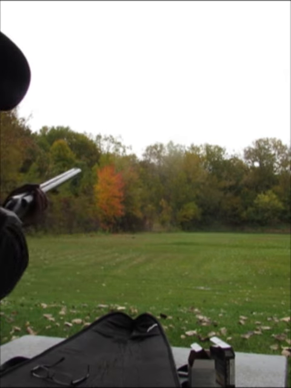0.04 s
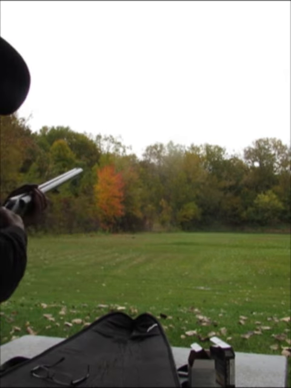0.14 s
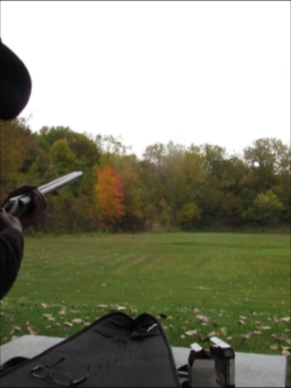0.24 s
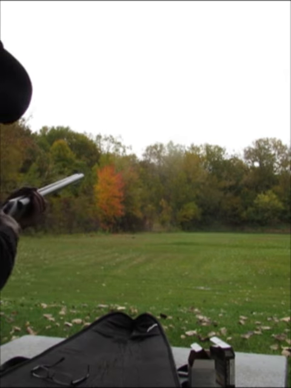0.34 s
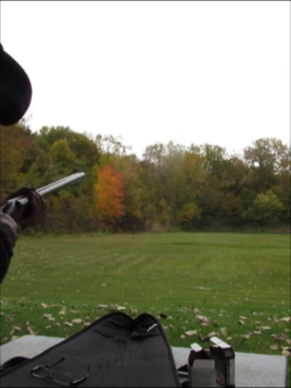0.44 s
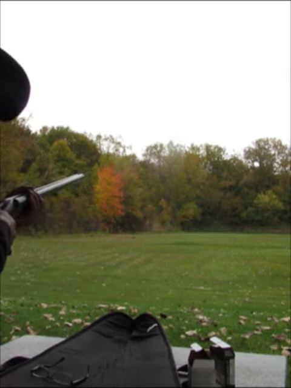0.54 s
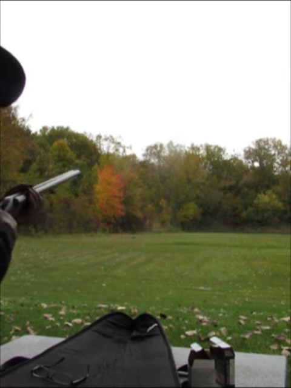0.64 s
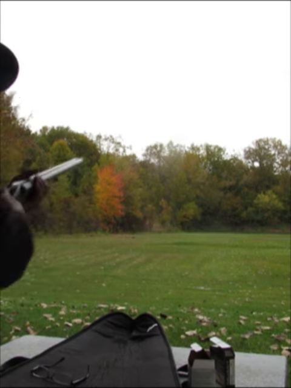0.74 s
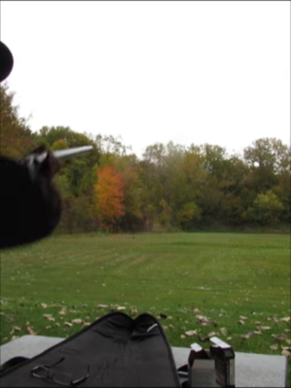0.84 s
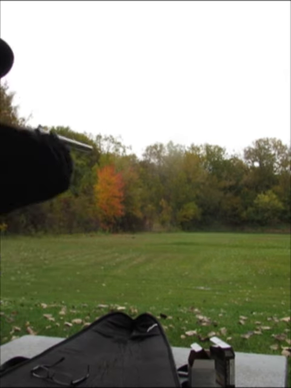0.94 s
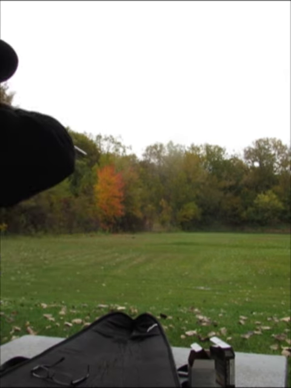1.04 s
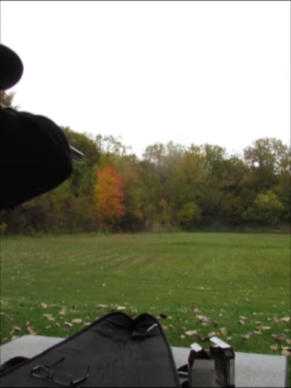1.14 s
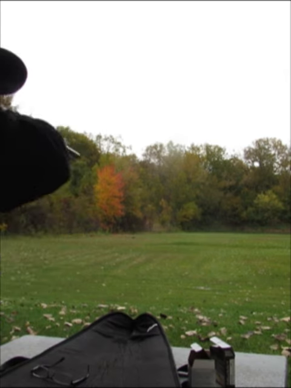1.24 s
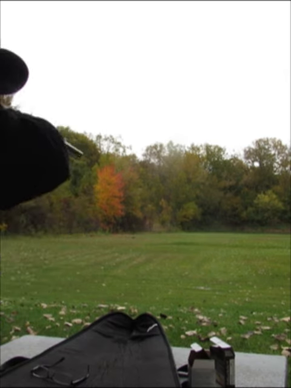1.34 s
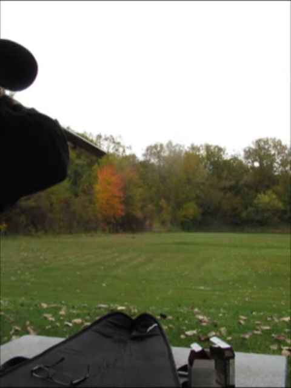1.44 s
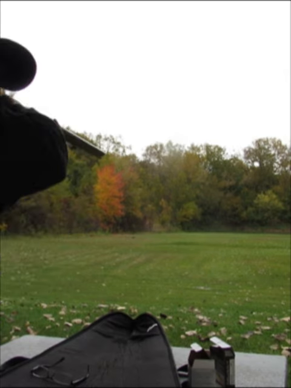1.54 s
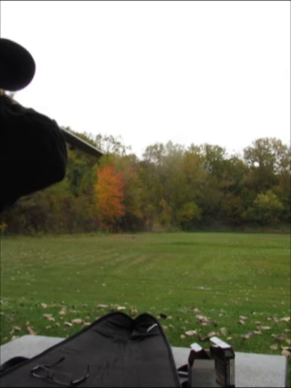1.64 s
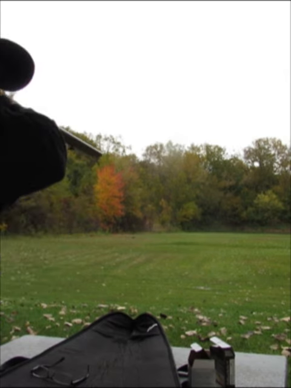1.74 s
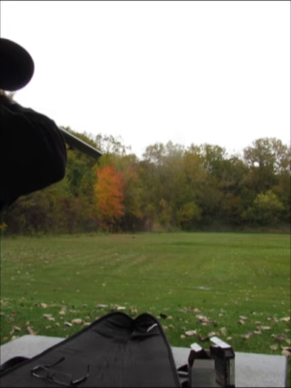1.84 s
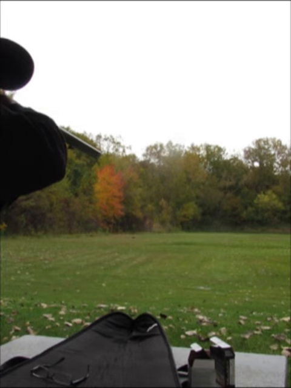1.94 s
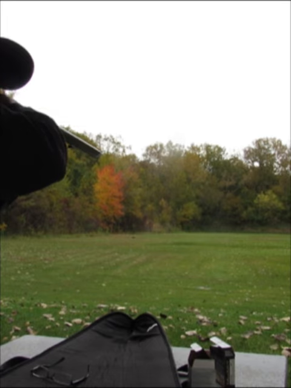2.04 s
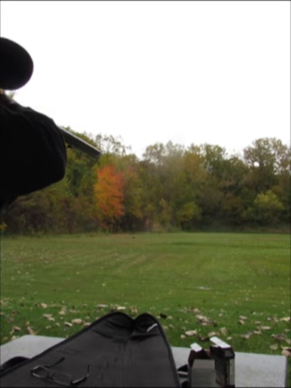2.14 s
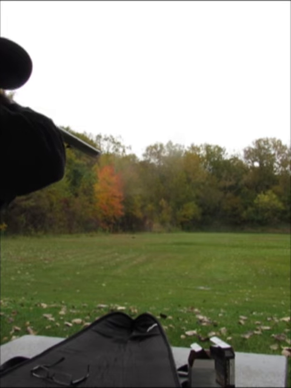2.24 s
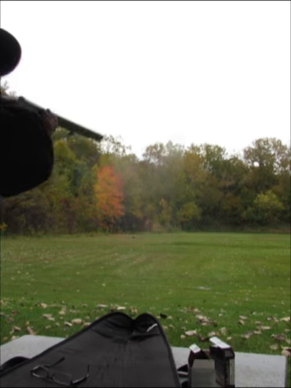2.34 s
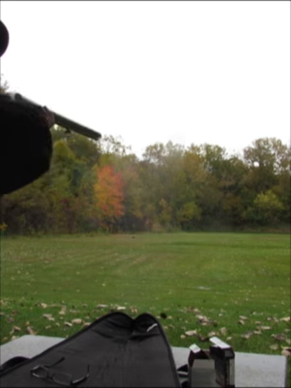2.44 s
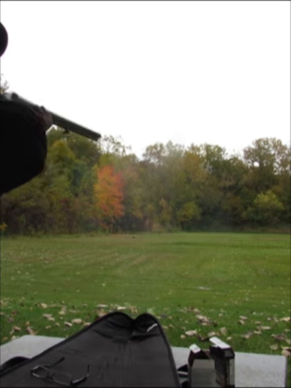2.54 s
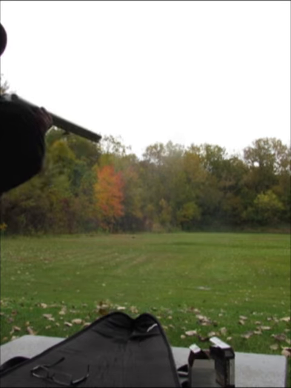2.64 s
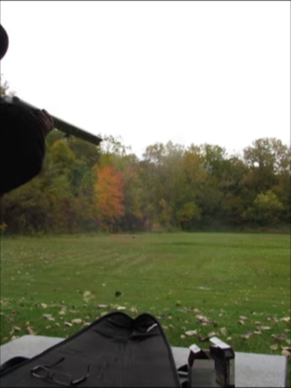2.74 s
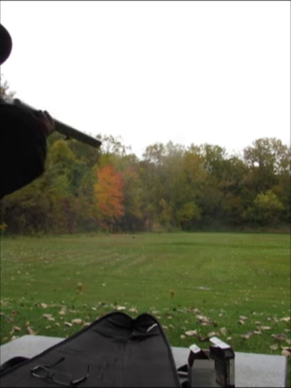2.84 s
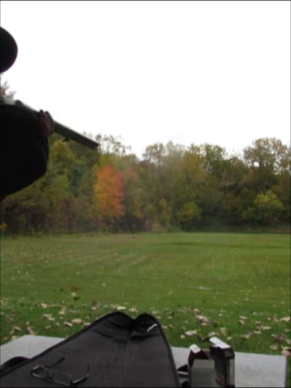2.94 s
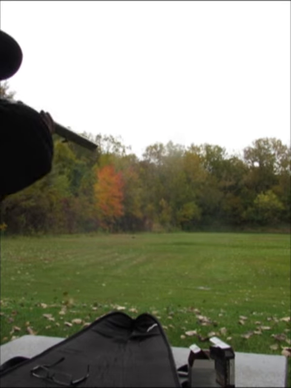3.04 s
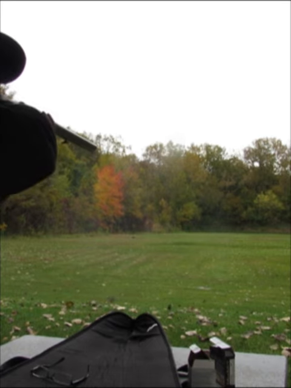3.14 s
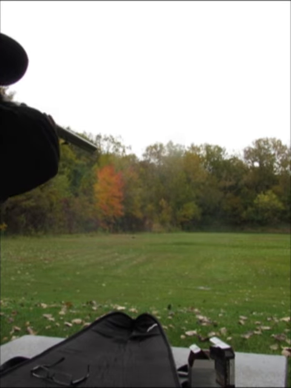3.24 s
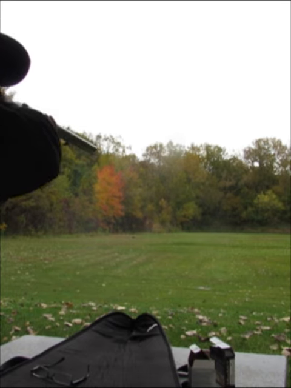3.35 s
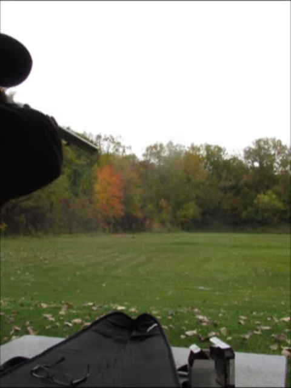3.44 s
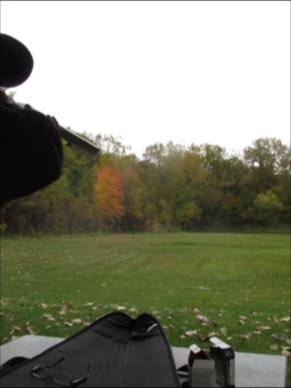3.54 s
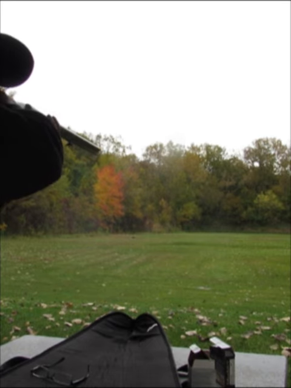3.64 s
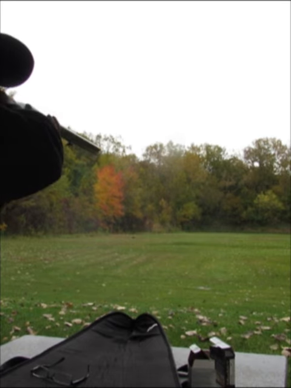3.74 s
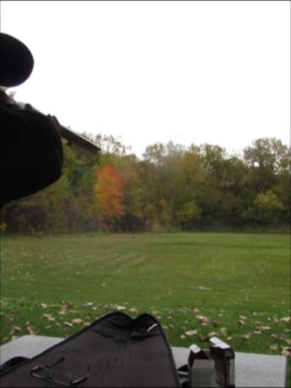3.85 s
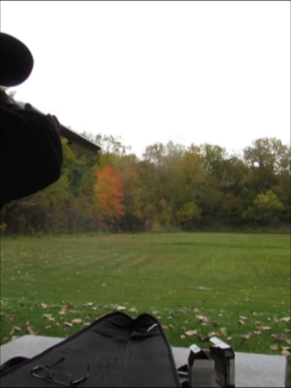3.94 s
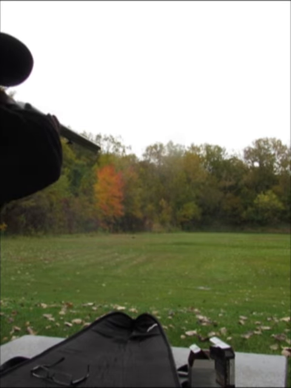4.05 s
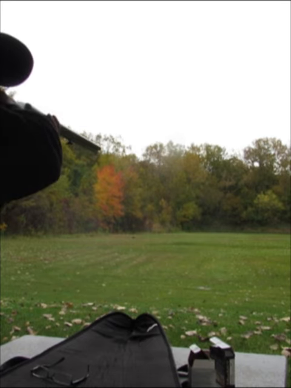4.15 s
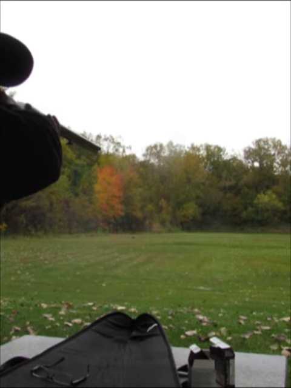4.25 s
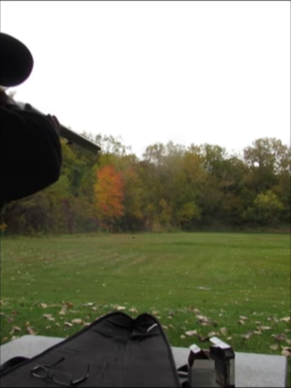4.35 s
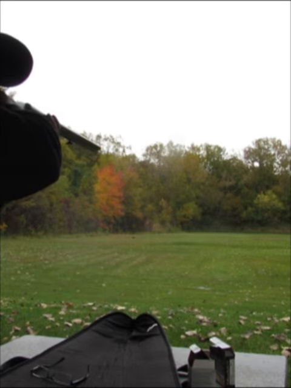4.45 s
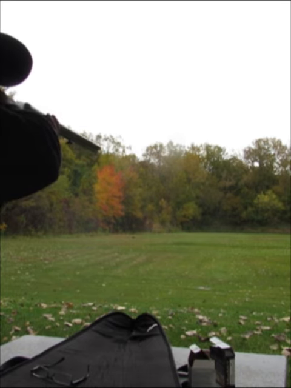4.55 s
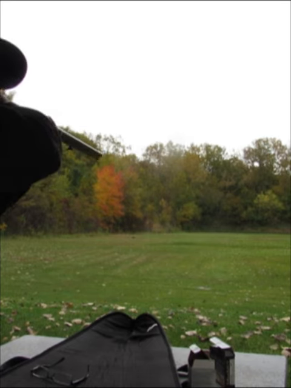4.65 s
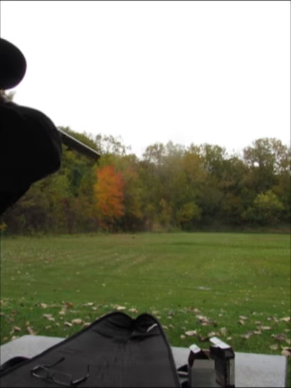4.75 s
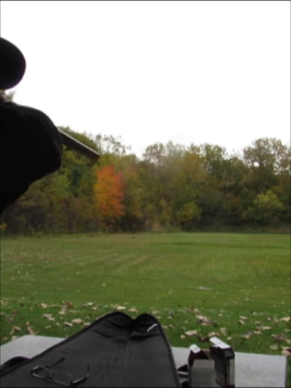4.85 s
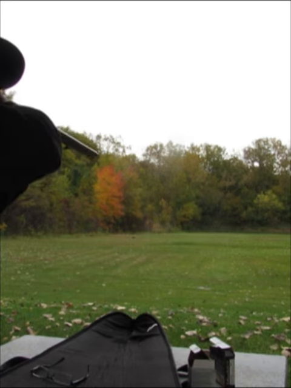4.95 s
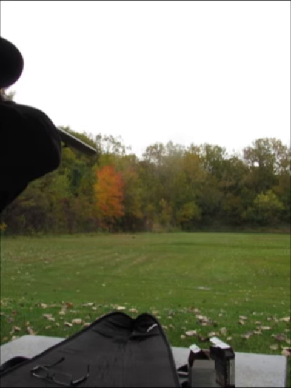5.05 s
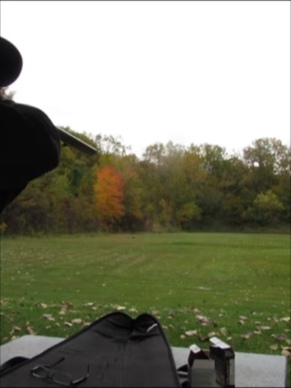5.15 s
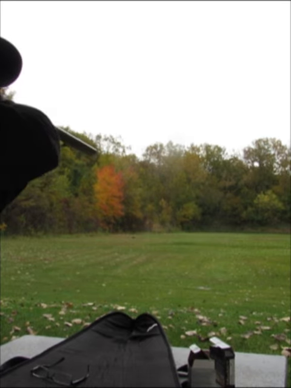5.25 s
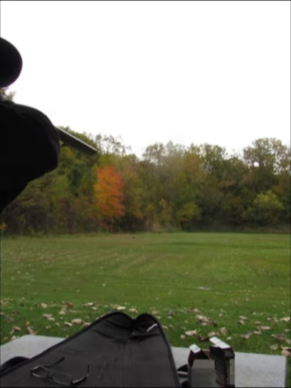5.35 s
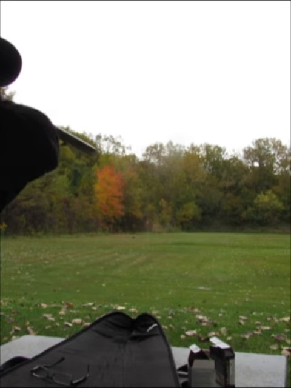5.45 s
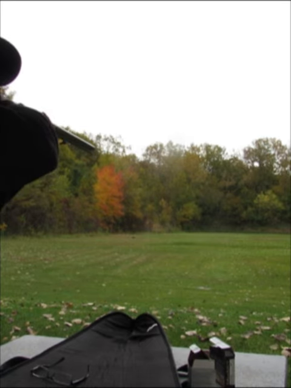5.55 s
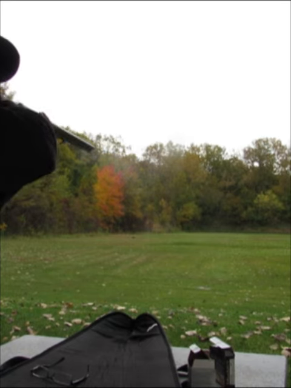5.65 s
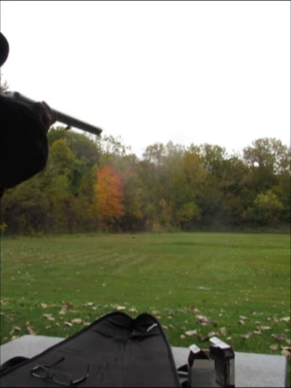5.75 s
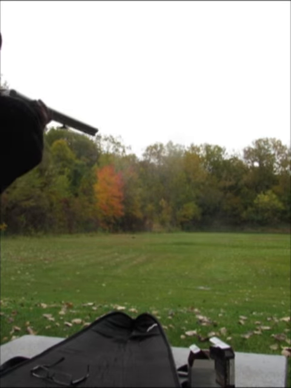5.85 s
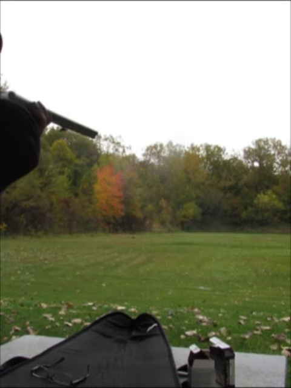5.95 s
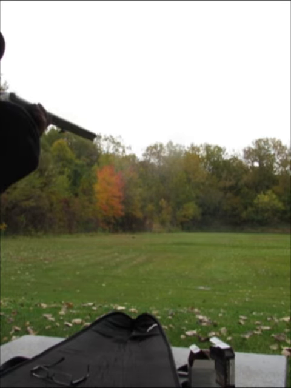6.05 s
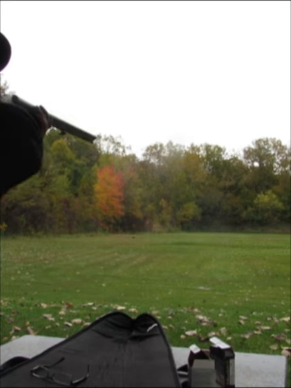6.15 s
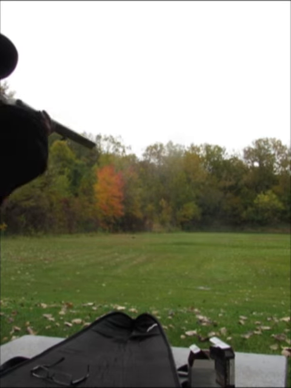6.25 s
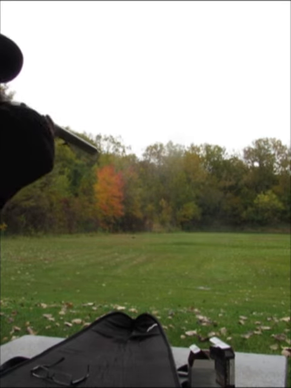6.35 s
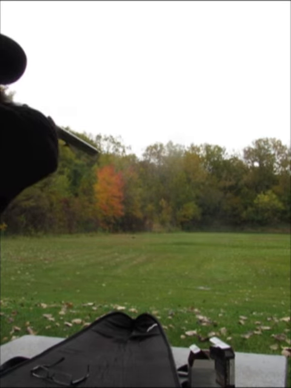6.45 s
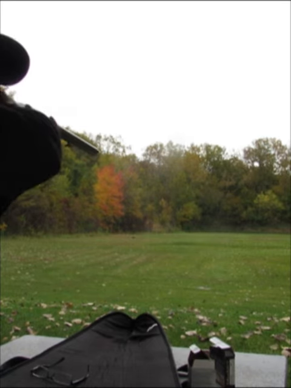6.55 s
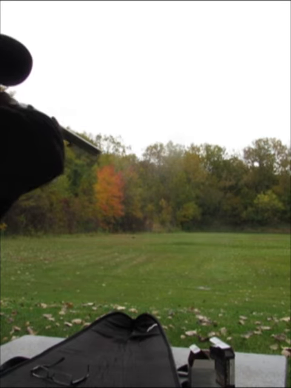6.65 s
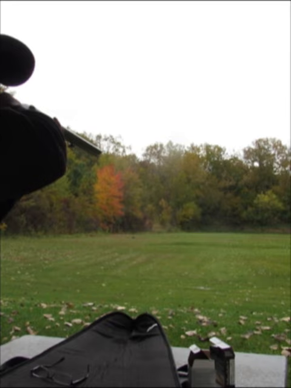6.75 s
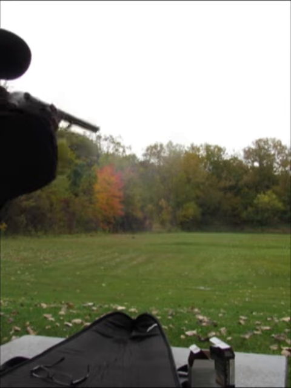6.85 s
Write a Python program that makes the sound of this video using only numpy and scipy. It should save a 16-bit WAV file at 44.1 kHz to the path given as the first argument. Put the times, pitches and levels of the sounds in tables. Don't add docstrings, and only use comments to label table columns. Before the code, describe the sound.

An open field edged by woods, heard from a small stereo microphone on a shooting bench, with low wind buffeting and soft leafy, clothy hiss. Light metal ticks begin at once; at 0.46 s a break-action gun snaps shut with a bright steel clack, followed by taps and handling from 0.7 to 1.1 s. A tiny silent gap at 1.46 s changes the scene; a wind thump and a faint falling bird whistle follow by 1.6 s. At 2.36 s the loudest shot overloads the microphone, booms in the bench and rolls back from the trees, duller and fading until about 4.6 s, with the background ducked and faint ticks. After another cut at 4.67 s, wind returns; a short trigger creak at 5.6 s leads into a sharper shot at 5.72 s. Knocks and thuds run 5.97 to 6.5 s over its echo. A third shot hits at 6.83 s, cut off by the ending.

```python
import sys
import numpy as np
from scipy import signal
from scipy.io import wavfile
from scipy.ndimage import uniform_filter1d

SR = 44100
rng = np.random.default_rng(int(sys.argv[2]) if len(sys.argv) > 2 else 0)


def bounce(signal):
    frames = np.transpose(np.atleast_2d(signal))
    limited = np.clip(frames, -1, 1)
    pcm = np.round(limited * 32767).astype(np.int16)
    wavfile.write(sys.argv[1], SR, pcm)


def gain_from_db(level_db):
    decades = np.asarray(level_db, float) / 20
    return 10 ** decades


N = 303849

CONTROL_STEP = 64
BAND_EDGES_HZ = 80 * 2 ** np.arange(0, 7.7, 1 / 3)
LEVEL_BAND_HZ = 800, 2500

# pitch_hz, level_db per Hz
FIELD_COLOUR = [(90, -1.5), (251, -10.5), (500, -13.5), (1620, -24.5), (3200, -32), (4600, -40),
                (12000, -47.5), (15000, -58)]
# pitch_hz, likeness (-1 to 1)
FIELD_LIKENESS = [(60, -0.62), (180, -0.067), (550, 0.036), (1650, 0.47), (4970, 0.66), (15000, 0.06)]
# time_s, level_db, tilt_db per octave
FIELD_LEVEL = [(0, -56.5, 3.5), (.42, -54, 1.93), (.9, -50, 2.12), (1.46, -51, 2.36), (1.47, -57, 2.53),
               (2.35, -57, 2.5), (2.37, -60.5, -5), (3.9, -72.5, 3.5), (4.66, -72, 4), (4.68, -56.5, 2.1),
               (5.71, -57.5, 2.1), (5.73, -66.5, -9.5), (6.9, -66, -10.5)]

# time_s, level_db
WIND_LEVEL = [(0, -48), (.55, -46), (.95, -47), (1.45, -35), (1.56, -38.5), (1.85, -46), (2.13, -41),
              (2.3, -54), (2.65, -58), (3.1, -54), (4.0, -66), (4.5, -51), (4.7, -56.5), (4.95, -41.5),
              (5.25, -49), (5.66, -45), (6.0, -68), (6.8, -67.5)]
# time_s, likeness (-1 to 1)
WIND_LIKENESS = [(0, 0), (1.46, 0), (1.47, -.7), (7, -.7)]
# time_s, level_db
WIND_PUFFS = [(0.0, -34.5), (.114, -41), (.6, -47), (.784, -40), (1.358, -58), (1.948, -54), (2.092, -40),
              (3.264, -57), (3.426, -53), (3.586, -50), (3.774, -37.5), (4.118, -55), (4.616, -43),
              (4.847, -35), (5.106, -43), (5.384, -48), (5.486, -52), (5.594, -55), (6.328, -59),
              (6.54, -59)]
# start_s, peak_db, pitch_hz
GUSTS = [(1.472, -20.5, 93), (1.588, -38, 77), (1.649, -40, 96.9), (1.914, -30.5, 114), (2.037, -34, 94),
         (2.096, -35, 69), (3.763, -41, 89), (4.088, -55, 107), (4.496, -51, 92), (4.568, -38, 74),
         (4.599, -49, 87.5), (4.824, -56, 72.7), (5.088, -47, 142), (5.469, -50, 61.9),
         (6.678, -42.5, 96.9)]
PUFF_S, GUST_S = 0.019, 0.045
GUST_OPPOSITE = 6

# time_s, pitch_hz, level_db
BIRD_WHISTLE = [(1.491, 3440, -70), (1.55, 3360, -67), (1.595, 3300, -76), (1.625, 3240, -56),
                (1.66, 3150, -66), (1.73, 3100, -74)]

# pitch_hz, level_db per Hz
WOODS_COLOUR = [(90, -13), (127, -3.5), (347, -2), (688, 1), (1450, -2), (2800, -12), (7890, -29.5),
                (14000, -58.5)]
# pitch_hz, likeness (-1 to 1)
WOODS_LIKENESS = [(60, 0.23), (180, 1), (550, 0.73), (1650, 0.93), (4970, 0.91), (15000, 0.21)]
# pitch_hz, left_over_right_db
WOODS_PAN = [(60, -4), (240, -8), (950, -1), (3770, -0.5), (15000, 2.5)]
# time_after_shot_s, level_db
ROLLS = [
    [(.16, -24.5), (.25, -27.5), (.57, -31), (.85, -34), (1.1, -37.5), (1.3, -40), (1.6, -44.5),
     (1.9, -50.5), (2.3, -55)],
    [(.15, -34), (.23, -34.5), (.47, -38.5), (.75, -40), (1.1, -43)],
]
ROLL_BASS_DB = [-0.93, 1.5]
# pitch_hz, loss_db per second of travel
AIR_LOSS = [(100, -12.5), (270, -5), (1400, -1.4), (2800, 6), (4600, 15.5), (10000, 50), (15000, 101)]
WOODS_COLOUR_AT_S = 0.48
TREELINE_S, TREELINE_WIDTH_S = 1.1, 0.17
TREELINE_DB_PER_OCTAVE, TREELINE_FROM_HZ = 6.5, 1100
TREELINE_SHARE = [0.67, .3]

# start_s, peak_db, pitch_hz, t60_s
TICKS = [(0.0044, -43.5, 4900, 0.32), (0.003, -42.5, 1570, 0.32), (0.2794, -53, 6040, 0.05),
         (0.304, -45.5, 2500, 0.05), (0.3994, -52, 3500, 0.041), (0.7557, -41, 4860, 0.05),
         (0.9388, -42.5, 5530, 0.083), (1.0594, -48, 8360, 0.093), (1.1194, -44, 5920, 0.025),
         (3.9494, -64, 6500, 0.046), (4.0494, -61, 8500, 0.037), (4.1994, -67, 7000, 0.052),
         (4.3294, -67, 6500, 0.05), (4.3694, -61, 7000, 0.043), (4.5294, -60, 8200, 0.038),
         (4.6952, -46.5, 4230, 0.032), (5.1094, -62, 3530, 0.056), (5.3408, -49, 4290, 0.027),
         (6.6967, -48, 4060, 0.053), (6.7494, -52, 3650, 0.06)]
# start_s, peak_db, pitch_hz, t60_s
KNOCKS = [
    (0.768, -27, 380, 0.065),
    (5.969, -26, 2730, 0.053),
    (5.989, -22, 263, 0.048),
    (6.2, -17.5, 471, 0.041),
    (6.259, -23, 524, 0.032),
    (6.398, -26, 506, 0.15),
    (6.511, -25, 476, 0.076),
          (0.731, -41, 1300, 0.23), (0.761, -37, 1500, .08), (.96, -47, 5200, .08),
               (.742, -39, 1880, 0.065), (0.758, -45, 4750, 0.14), (0.777, -38.5, 1870, 0.06),
               (0.791, -40.5, 7200, .02), (.938, -46, 5600, .04), (0.944, -37, 1700, 0.043),
               (.947, -44, 2900, .05), (1.12, -37, 1580, 0.044)]

# time_s, slip_rate_hz, level_db
CREAK_START = [(5.59, 940, -70), (5.61, 950, -64), (5.635, 955, -72)]
# multiple, level_db
CREAK_START_PARTIALS = [(3, 0), (5, 0), (6, -3), (10, -5)]
# time_s, slip_rate_hz, level_db
CREAK = [(5.61, 950, -70), (5.63, 955, -58), (5.64, 966, -49), (5.68, 968, -47), (5.713, 968, -51)]
# multiple, level_db
CREAK_PARTIALS = [(4, -2), (5, -26), (6, -19), (7, -20), (8, -13), (10, -24), (12, -28)]

# start_s, peak_db
LATCH = [
    (0.4572, -9.5),
]
# pitch_hz, half_width_hz, level_db
STEEL = [(700, 450, -23), (1830, 240, 4), (3500, 1600, -3.5), (6120, 1050, 9), (9100, 840, -15),
         (13000, 1370, 11)]

# pitch_hz, level_db, t60_s
BENCH_MODES = [(131.8, -2, 0.55), (143.9, -4.5, 0.35), (198.2, -7, 0.17), (241.4, -9.5, 0.052),
               (265, -4, .22), (293.6, 0, 0.23), (339, -1, 0.29), (396, -11, .15), (450, -5.5, 0.16),
               (571, -11, 0.19)]
# level_db, swell_s, share of ring time, deepest_mode_db
BENCH_BOOMS = [
    (3.5, 0.041, 1.3, -2),
    (-2, 0.025, 1.5, -5.5),
    (-3.5, 0.019, 0.49, -8),
]
BENCH_ECHO_S, BENCH_ECHO_DB = 0.0046, 4
LULL_S, LULL_WIDTH_S, LULL_DEPTH = 0.141, 0.0056, 0.8

# start_s, drive_db, blast_t60_s, crack_db, stereo_spread (0 to 1)
SHOTS = [
    (2.3568, -1.5, 0.46, 3, 0.9),
    (5.715, -3.5, 0.4, 9.5, 0.6),
    (6.833, -5.5, 0.56, 8.5, 0.7),
]
# dull_db, bright_edge_db
MUZZLE_DB = [
    (6., -10.),
    (4., 0.),
    (-6., -18.),
]
# pitch_hz, level_db per band
BLAST_COLOUR = [(100, -9.5), (250, -4.5), (500, -9), (1300, -1.5), (3000, -12), (7000, -6.5), (14000, -6.5)]
# pitch_hz, share of blast t60
BLAST_DECAY = [(100, 0.79), (1000, 0.78), (4000, 0.86), (14000, 0.42)]
# pitch_hz, likeness (-1 to 1)
BLAST_LIKENESS = [(100, .4), (500, .4), (1300, 0.5), (2400, 1), (4400, 0.65), (8000, 0.33), (14000, .25)]
GAS_SWELL_S = 0.013
CRACK_SIDE_SHARE = 0.25
SLAM_DB, SLAM_S = -0.5, 0.096

# start_s, end_s
SCENE_CHANGES = [
    (1.4612, 1.4712),
    (4.666, 4.6765),
]


def rms_one(x):
    return x / np.sqrt(np.mean(x ** 2) + 1e-20)


def at_hz(points, hz):
    pitch_hz, value = np.array(points).T[:2]
    return np.interp(np.log(hz), np.log(pitch_hz), value)


def in_time(rows, t):
    time_s, *columns = np.transpose(rows)
    return np.array([np.interp(t, time_s, column) for column in columns])


def band(x, low_hz, high_hz, order=2):
    sos = signal.butter(order, [low_hz, min(high_hz, 0.45 * SR)], "band", fs=SR, output="sos")
    return signal.sosfilt(sos, x)


def drift(rate_hz):
    r = np.exp(-2 * np.pi * rate_hz * CONTROL_STEP / SR)
    noise = rng.standard_normal(N // CONTROL_STEP + 1001)
    return rms_one(signal.lfilter([1], [1, -2 * r, r * r], noise)[1000:])


def ring(x, hz, t60):
    r, w = gain_from_db(-60 / (t60 * SR)), 2 * np.pi * hz / SR
    return signal.lfilter([0, np.sin(w)], [1, -2 * r * np.cos(w), r * r], x + 1e-18)


def stereo(mid, side, likeness):
    likeness = np.clip(likeness, -0.97, 0.97)
    return mid + np.sqrt((1 - likeness) / (1 + likeness)) * side * [[1], [-1]]


def add(out, start_s, sound):
    i = round(start_s * SR)
    out[:, i:i + sound.shape[-1]] += sound[..., :N - i]


def diffuse(level_db, colour, likeness, patchy_db, pan=((1, 0), (2, 0))):
    t = np.arange(N // CONTROL_STEP + 1) * CONTROL_STEP / SR
    steps = np.arange(N) / CONTROL_STEP
    centres = np.sqrt(BAND_EDGES_HZ[1:] * BAND_EDGES_HZ[:-1])
    widths = np.diff(BAND_EDGES_HZ)
    share_db = at_hz(colour, centres) + 10 * np.log10(widths)
    counted = (centres > LEVEL_BAND_HZ[0]) & (centres < LEVEL_BAND_HZ[1])
    share_db -= 10 * np.log10(np.sum(gain_from_db(2 * share_db[counted])))
    out = np.zeros((2, N))
    white = rng.standard_normal((2, 2, N))
    together = drift(3.5)
    for k, hz in enumerate(centres):
        db = share_db[k] + level_db(t, hz) + patchy_db * (0.53 * together + drift(13.0))
        noise = band(white[k % 2], BAND_EDGES_HZ[k], BAND_EDGES_HZ[k + 1], order=3)
        mid, side = noise * np.sqrt(SR / 2 / widths[k])
        lean = gain_from_db(at_hz(pan, hz) / 2 * np.array([[1], [-1]]))
        gain = np.interp(steps, np.arange(len(t)), gain_from_db(db))
        out += lean * stereo(mid, side, at_hz(likeness, hz)) * gain
    return out


def glide_tone(rows, partials, wobble):
    t = np.arange(rows[0][0], rows[-1][0], 1 / SR)
    hz, level_db = in_time(rows, t)
    unsteady_hz = hz * (1 + wobble * rng.standard_normal(len(t)))
    phase = 2 * np.pi * np.cumsum(unsteady_hz) / SR
    fade = np.minimum(np.minimum(t - t[0], t[-1] - t) / 0.01, 1)
    return np.sqrt(2) * fade * sum(gain_from_db(level_db + db) * np.sin(k * phase) for k, db in partials)


def field_db(t, hz):
    level_db, tilt_db = in_time(FIELD_LEVEL, t)
    return level_db + tilt_db * max(np.log2(hz / 1400), 0)


def field():
    return diffuse(field_db, FIELD_COLOUR, FIELD_LIKENESS, patchy_db=0.7)


def wind():
    t = np.arange(N) / SR
    gain = gain_from_db(in_time(WIND_LEVEL, t)[0])
    gain += sum(gain_from_db(db) * np.exp(-((t - s) / PUFF_S) ** 2) for s, db in WIND_PUFFS)
    lumps_db = np.interp(np.arange(N) / CONTROL_STEP, np.arange(N // CONTROL_STEP + 1), drift(9.0))
    turbulence = band(rng.standard_normal((2, N)), 35, 120) * gain_from_db([[1.5], [4.0]] * lumps_db)
    mid, side = (rms_one(part) for part in turbulence)
    out = gain * stereo(mid, side, in_time(WIND_LIKENESS, t)[0])
    u = np.arange(round(GUST_S * SR)) / SR
    for start_s, peak_db, hz in GUSTS:
        thump = gain_from_db(peak_db) * np.sin(2 * np.pi * hz * u) * np.sin(np.pi * u / GUST_S)
        add(out, start_s, thump * [[1 + GUST_OPPOSITE], [1 - GUST_OPPOSITE]])
    return out


def bird():
    return glide_tone(BIRD_WHISTLE, [(0.98, 0)], wobble=0.093)


def roll_db(t, hz):
    out = np.full(len(t), -140.0)
    ends = [SCENE_CHANGES[1][0], SHOTS[2][0] + 0.01]
    for shot_row, rows, bass_db, share, end in zip(SHOTS, ROLLS, ROLL_BASS_DB, TREELINE_SHARE, ends):
        late = t - shot_row[0]
        octaves = max(np.log2(hz / TREELINE_FROM_HZ), 0)
        swell = np.exp(-((late - TREELINE_S) / TREELINE_WIDTH_S) ** 2)
        treeline_db = share * TREELINE_DB_PER_OCTAVE * octaves * swell
        air_db = at_hz(AIR_LOSS, hz) * (np.maximum(late, 0.12) - WOODS_COLOUR_AT_S)
        db = in_time(rows, late)[0] - air_db + treeline_db + bass_db * (150 < hz < 500)
        out = np.where((late > 0.03) & (t < end), db, out)
    return out


def woods_roll():
    return diffuse(roll_db, WOODS_COLOUR, WOODS_LIKENESS, patchy_db=0.9, pan=WOODS_PAN)


def touches(rows, wide):
    out = np.zeros((2, N))
    t = np.arange(SR // 5) / SR
    for start_s, peak_db, hz, t60 in rows:
        noise = rng.standard_normal((2, len(t)))
        puff = rms_one(band(noise.mean(axis=0) + 0.24 * noise, hz / wide, hz * wide))
        decay = gain_from_db(peak_db - 2.0 - 60 * t / t60)
        add(out, start_s, decay * puff * np.minimum(t / 0.0018, 1))
    return out


def trigger_creak():
    out = np.zeros((2, N))
    add(out, CREAK_START[0][0], glide_tone(CREAK_START, CREAK_START_PARTIALS, wobble=0.15))
    add(out, CREAK[0][0], glide_tone(CREAK, CREAK_PARTIALS, wobble=0.019))
    return out


def with_bench_echo(x):
    lag = round(BENCH_ECHO_S * SR)
    echo = np.pad(x, [(0, 0), (lag, 0)])[:, :x.shape[1]]
    return x + gain_from_db(BENCH_ECHO_DB) * echo


def latch(peak_db):
    t = np.arange(SR // 4) / SR
    decay = gain_from_db(-60 * t / 0.0056) + gain_from_db(-15.0 - 60 * t / 0.19)
    rattle = rng.standard_normal((2, len(t))) * decay
    rattle = rattle.mean(axis=0) + 0.23 * rattle
    steel = sum(gain_from_db(db) * band(rattle, hz - width, hz + width) / np.sqrt(width) for hz, width, db in STEEL)
    clack = rms_one(steel) + gain_from_db(4.5) * rms_one(band(rattle, 520, 12400))
    clack = with_bench_echo(clack)
    return gain_from_db(peak_db + 4.5) * clack / np.abs(clack).max()


def bench_boom(level_db, swell_s, ring_share, deepest_db):
    t = np.arange(SR) / SR
    out = np.zeros(SR)
    for hz, db, t60 in BENCH_MODES:
        rise = t / (swell_s * (300 / hz) ** 0.35)
        shake = rng.standard_normal(SR) * rise ** 2 * np.exp(-rise * 1.45)
        mode = ring(shake, hz, t60 * ring_share)
        out += gain_from_db(db + deepest_db * (hz < 160)) * mode / np.abs(mode).max()
    lull = 1 - LULL_DEPTH * np.exp(-((t - LULL_S) / LULL_WIDTH_S) ** 2)
    return gain_from_db(level_db - 8.5) * lull * out * gain_from_db([[-2.2], [2.2]])


def muzzle_pulse(t, dull_db, edge_db):
    pulse = np.where(t < 0.001, 2 * t / 0.001 - 1, 0) * np.minimum(t / 0.0003, 1)
    dull = gain_from_db(dull_db) * (band(pulse, 250, 12000) + 0.024 * ring(pulse, 1100, 0.01))
    edge_gain = gain_from_db(edge_db - 60 * np.abs(t - 0.0007) / 0.004)
    return dull + edge_gain * band(rng.standard_normal(SR), 1500, 15000)


def bench_crack(t, crack_db):
    late = np.maximum(t - BENCH_ECHO_S, 0)
    mid = band(rng.standard_normal(SR), 900, 15000)
    side = band(rng.standard_normal(SR), 4000, 15000)
    return gain_from_db(crack_db - 60 * late / 0.009) * (late > 0) * (mid + CRACK_SIDE_SHARE * side * [[1], [-1]])


def roaring_gas(t, drive_db, t60, spread):
    out = np.zeros((2, SR))
    white = rng.standard_normal((2, 2, SR))
    edges = BAND_EDGES_HZ[::2]
    for k, (low, high) in enumerate(zip(edges, edges[1:])):
        hz = np.sqrt(low * high)
        mid, side = band(white[k % 2], low, high)
        gas = rms_one(stereo(mid, spread * side, at_hz(BLAST_LIKENESS, hz)))
        swell = 1 - np.exp(-t / GAS_SWELL_S * (hz / 300) ** 2)
        decay_db = 60 * t / (t60 * at_hz(BLAST_DECAY, hz))
        out += swell * gas * gain_from_db(drive_db + 4.5 + at_hz(BLAST_COLOUR, hz) - decay_db)
    return out


def port_slam(t):
    slam = rms_one(band(rng.standard_normal(SR), 60, 600))
    return slam * gain_from_db(SLAM_DB - 60 * (t / SLAM_S) ** 2) * [[1], [-1]]


def shot(dull_db, edge_db, drive_db, t60, crack_db, spread):
    t = np.arange(SR) / SR
    rise = np.interp(t, [0, 0.001, BENCH_ECHO_S, 0.009], [0, 0.12 * gain_from_db(dull_db), 0.2, 1])
    front = muzzle_pulse(t, dull_db, edge_db) + bench_crack(t, crack_db)
    return front + rise * (roaring_gas(t, drive_db, t60, spread) + port_slam(t))


def scene():
    out = field() + wind() + woods_roll()
    add(out, BIRD_WHISTLE[0][0], bird())
    out += touches(TICKS, wide=1.54) + touches(KNOCKS, wide=1.22)
    out += trigger_creak()
    for start_s, peak_db in LATCH:
        add(out, start_s, latch(peak_db))
    for (start_s, *blast), muzzle_db, boom in zip(SHOTS, MUZZLE_DB, BENCH_BOOMS):
        add(out, start_s, bench_boom(*boom) + shot(*muzzle_db, *blast))
    return out


def housing_dip(x):
    dip_hz, width_hz, depth = 683.5, 238, 0.84
    r, w = np.exp(-np.pi * width_hz / SR), 2 * np.pi * dip_hz / SR
    resonance = signal.lfilter((1 - r * r) / 2 * np.array([1, 0, -1]), [1, -2 * r * np.cos(w), r * r], x)
    return x - depth * resonance


def overload(x):
    matrix = np.array([[1, 0.65], [1, -1.01]])
    capsules = matrix @ x / 2
    peak = np.abs(capsules).max(axis=0)
    release_db = 370.0 * np.arange(N) / SR
    over_db = np.maximum(20 * np.log10(peak + 1e-9) - 2.0, 0)
    held_db = np.maximum.accumulate(over_db + release_db) - release_db
    loud = uniform_filter1d(peak, size=441, origin=220) > 0.12
    attack = np.exp(-1 / (0.006 * SR))
    cut_db, busy = signal.lfilter([1 - attack], [1, -attack], [held_db, loud])
    top = (1.05 - 0.45 * busy) * [[1], [0.9]]
    return matrix @ (top * np.tanh(capsules * gain_from_db(-cut_db) / top))


def low_pass(x):
    return signal.sosfilt(signal.butter(12, 16050, fs=SR, output="sos"), x)


def record(dry):
    x = overload(housing_dip(dry))
    x = signal.sosfilt(signal.butter(1, 60, "high", fs=SR, output="sos"), x)
    x = signal.sosfilt(signal.cheby2(10, 55, 16100, fs=SR, output="sos"), x)
    for start_s, end_s in SCENE_CHANGES:
        x[:, round(start_s * SR):round(end_s * SR)] = 0
    return low_pass(x)


dry = scene()
out = record(dry)
bounce(out)
```